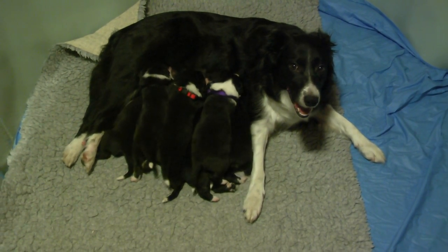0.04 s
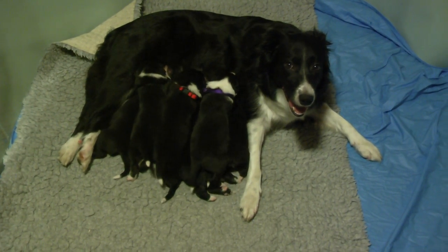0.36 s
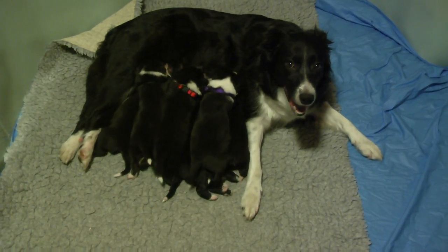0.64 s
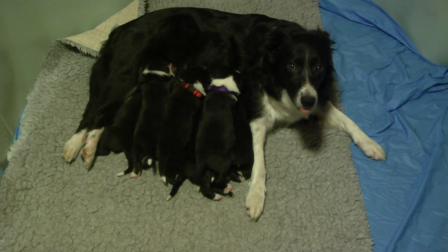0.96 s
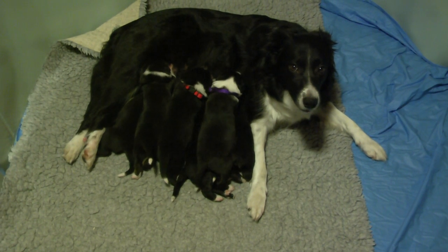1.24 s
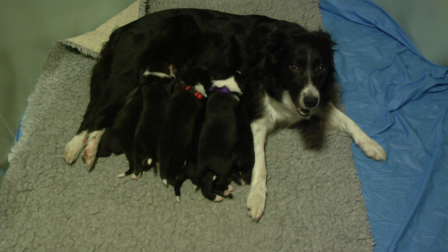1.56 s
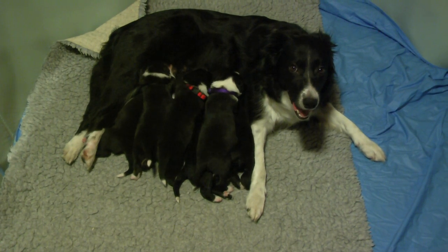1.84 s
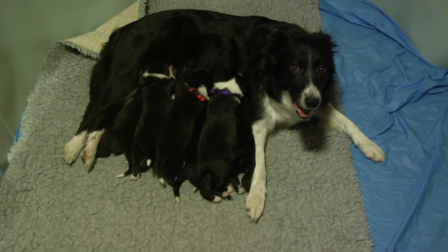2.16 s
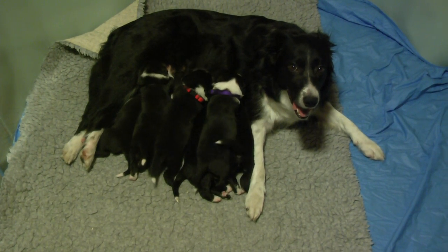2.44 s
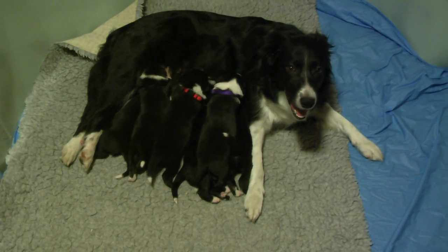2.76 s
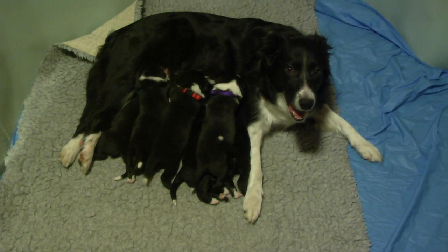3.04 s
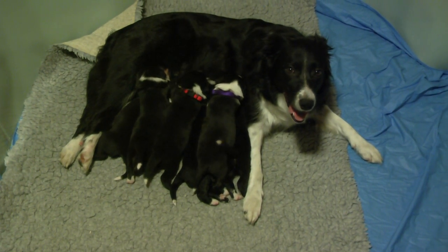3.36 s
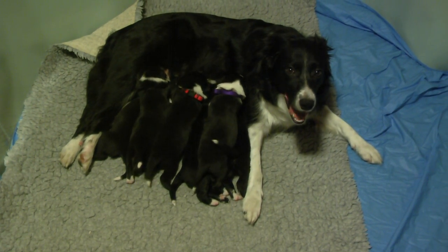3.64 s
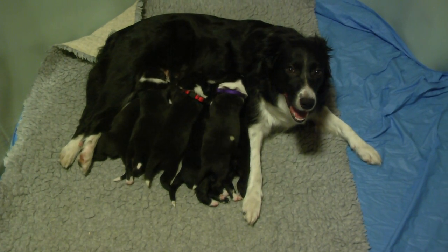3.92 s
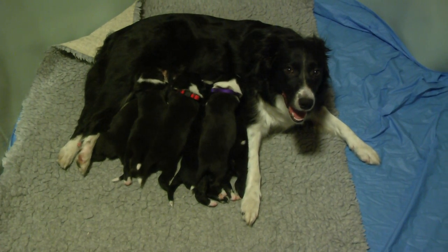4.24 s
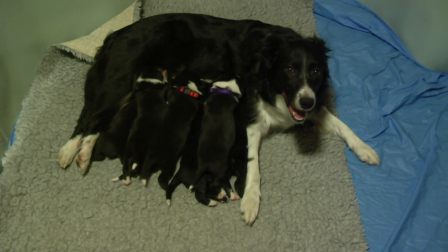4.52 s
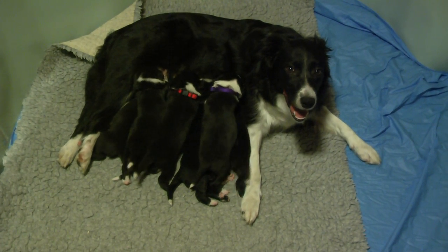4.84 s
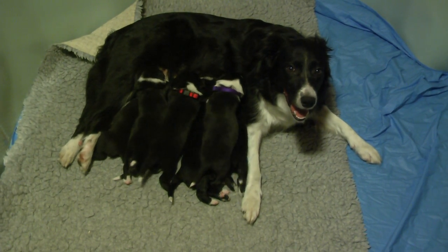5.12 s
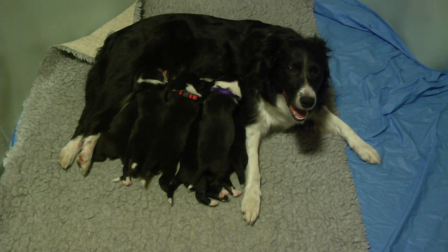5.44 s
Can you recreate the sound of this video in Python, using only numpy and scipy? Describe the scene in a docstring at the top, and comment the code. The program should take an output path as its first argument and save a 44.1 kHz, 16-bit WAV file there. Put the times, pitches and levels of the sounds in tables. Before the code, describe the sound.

Wet lip smacks and little clicks of nursing puppies grow busier over a dog's soft panting and faint room hum.

```python
"""Puppies suckling beside their mother on a rug in a small, quiet room; one microphone above them.
From the start, over still air and a faint hum, the mother pants softly, about three times a second.
Tongues click off the teats, gulps and nudges plop low, and near 0.9 s wet lips smack: films of milk
tearing in swelling bursts of tiny clicks. From 3.3 s the smacks crowd in, at first with thin squeaks;
the loudest falls at 4.1 s and softer ones follow to the end. The bare walls answer each sound."""
import sys
import numpy as np
from scipy import signal
from scipy.fft import rfft, irfft
from scipy.io import wavfile
from scipy.ndimage import uniform_filter1d

SR = 44100
rng = np.random.default_rng(int(sys.argv[2]) if len(sys.argv) > 2 else 0)


def wav_record(signal):
    """Record a signal, one row per channel, as 16-bit PCM in the file named by sys.argv[1]."""
    frames = np.transpose(np.atleast_2d(signal))
    bounded = np.clip(frames, -1, 1)
    # unit amplitude maps onto the largest positive 16-bit level
    quanta = np.round(bounded * 32767).astype(np.int16)
    wavfile.write(sys.argv[1], SR, quanta)


N = 246078


def gain_of(db):
    """Decibels to amplitude."""
    return 10 ** (np.asarray(db) / 20)


def unit_rms(x):
    """Scales to rms 1."""
    return x / np.sqrt(np.mean(x ** 2) + 1e-20)


def read(points, hz):
    """Reads a table on a log-frequency axis."""
    f, value = np.transpose(points)
    return np.interp(np.log(hz + 1), np.log(f + 1), value)


def shelf(hz, edge_hz):
    """Rises from 0 to 1 over the octave above the edge."""
    return np.clip(np.log2(hz / edge_hz), 0, 1)


def colour(x, curve_db, size=4096):
    """Minimum-phase filter whose gain is curve_db(Hz)."""
    hz = abs(np.fft.fftfreq(size, 1 / SR)) + 1
    log_gain = np.log(gain_of(np.maximum(curve_db(hz), -100)))
    response = np.exp(np.conj(signal.hilbert(log_gain)))
    return signal.fftconvolve(x, np.fft.ifft(response).real[:size // 2])


def add(mix, s, sound):
    """Mixes a sound in at s seconds."""
    part = mix[max(round(s * SR), 0):][:len(sound)]
    part += sound[:len(part)]


def room_tone(air_db=-65.5):
    """The still room: a steady low murmur of air, thin hiss and a faint electric hum."""
    # spectrum of the air: (frequency [Hz], relative density [dB])
    air_spectrum = [(15, -51), (25, -10.5), (64, -11), (309, 4.5), (363, -0.5), (607, -1), (775, -9.5),
                    (988, -5.5), (1790, -10.5), (1940, -11), (3160, -14), (5880, -16.5), (7710, -27),
                    (10100, -18.5), (16000, -20.5)]
    # electric tones: (frequency [Hz], level [dB])
    hum_tones = [(200, -80.5), (318, -77.5), (601, -78), (1000, -82), (2000, -81.5)]
    hz, t = np.fft.rfftfreq(N, 1 / SR), np.arange(N) / SR
    air = irfft(rfft(rng.standard_normal(N)) * gain_of(read(air_spectrum, hz)), N)
    hum = sum(gain_of(db) * np.sqrt(2) * np.sin(2 * np.pi * (f * t + rng.random()))
              for f, db in hum_tones)
    return gain_of(air_db) * unit_rms(air) + hum


def echo_paths(build_s=0.0025, echoes_per_s=5000):
    """Rug to microphone: direct sound, early reflections, and a tail that dies band by band."""
    # first reflections off floor and walls: (delay [s], gain against the direct sound [ratio])
    walls = [(.0023, 0.51), (.0056, 0.34), (.0072, 0.39), (.0094, 0.35), (0.0114, .45), (0.0253, 0.57)]
    # decay of the tail: (frequency [Hz], time to fall 60 dB [s])
    decay_times = [(150, 0.096), (500, 0.39), (1500, 0.29), (4000, 0.23), (8000, 0.23), (16000, 0.11)]
    # diffuse tail: (frequency [Hz], level against the direct sound [dB])
    tail_levels = [(150, -6), (500, -0.5), (1200, 2.5), (4000, -0.5), (16000, 2)]
    size = SR // 2
    echoes = rng.choice([-1., 1.], size) * (rng.random(size) < echoes_per_s / SR)
    hz, t, bands = signal.stft(echoes, SR, nperseg=256)
    decay = np.exp(-np.log(1000) * t / read(decay_times, hz)[:, None])
    tail = signal.istft(bands * decay, SR, nperseg=256)[1]
    tail *= 1 - np.exp(-np.arange(len(tail)) / SR / build_s)
    paths = colour(tail / np.linalg.norm(tail), lambda f: read(tail_levels, f))
    paths[0] += 1  # direct sound
    for delay, gain in walls:
        add(paths, delay * rng.uniform(.92, 1.08), np.array([gain]))
    return paths / np.linalg.norm(paths)


def room(x, hold_s=.23, tails=4):
    """The room's short echo; several random tails take turns so no single colouring sticks."""
    turn = np.arange(N) // round(hold_s * SR) % tails
    crossfades = [uniform_filter1d(1. * (turn == k), size=512) for k in range(tails)]
    return sum(signal.fftconvolve(x * share, echo_paths())[:N] for share in crossfades)


def breath(length_s, db, hiss_db, lift_db=12, teeth_hz=5500, tongue_db=1.0, ticks_per_s=55, tick_gain=13):
    """One stroke of panting: an arch of turbulence and saliva ticks, shaped anew by the tongue."""
    # air over her tongue: (frequency [Hz], relative density [dB])
    muzzle = [(200, -1.5), (600, -9), (1200, -4.5), (2100, -2), (3000, -3.5), (4200, -3), (5300, 2),
              (6500, 2), (16000, -14)]
    flow = np.sin(np.linspace(0, np.pi, max(round(length_s * SR), 2))).clip(0) ** 0.75
    saliva = tick_gain * (rng.random(SR) < ticks_per_s / SR)
    air = (rng.standard_normal(SR) + saliva)[:len(flow)] * flow
    tongue = np.column_stack([np.linspace(0, SR / 2, 60), tongue_db * rng.standard_normal(60)])

    def breath_db(hz):
        return db + lift_db + read(muzzle, hz) + hiss_db * shelf(hz, teeth_hz) + read(tongue, hz)
    return colour(air, breath_db)


def panting(turn_s=0.039, in_s=0.22, rest_s=0.028, in_hiss_db=1.5):
    """The mother breathes out, pauses, and draws air in over her teeth until the next cycle is near."""
    # cycles: (time [s], stroke out [s], relative level out [dB], relative level in [dB], teeth hiss [dB])
    pants = [(0, 0.028, -70, -86, 2), (.17, 0.14, -65.5, -69, 2), (.48, .15, -66.5, -70, 2),
             (.87, 0.13, -66.5, -71.5, 1), (1.115, 0.24, -67.5, -75, 4.5), (1.535, .145, -64.5, -68, 1.5),
             (1.92, .13, -66.5, -72.5, 0), (2.23, 0.11, -67, -72.5, 4.5), (2.58, .15, -80, -70.5, -0.5),
             (2.89, 0.11, -63, -69.5, -3), (3.32, 0.11, -61.5, -77, 3), (3.6, 0.26, -65.5, -80, -0.5),
             (3.921, 0.092, -71, -94, 2.5), (4.199, 0.078, -69.5, -85, 0), (4.59, .15, -62, -60.5, 3),
             (5.09, .2, -64.5, -79, 1.5)]
    out = np.zeros(N)
    ends = [row[0] for row in pants[1:]] + [N / SR]
    for (s, out_s, out_db, in_db, hiss_db), end in zip(pants, ends):
        in_start = s + out_s + turn_s
        in_length = min(in_s, end - rest_s - in_start)
        add(out, s, breath(out_s, out_db, hiss_db))
        add(out, in_start, breath(in_length, in_db, hiss_db + in_hiss_db))
    return out


def nudges(edge_hz=340, low_hz=130):
    """Paws and bodies bump the rug, which muffles each short scuff down to its lows."""
    # bumps: (time [s], strength [dB], fade [s])
    bumps = [(.895, -8, 0.027), (1.045, -11, 0.015), (1.098, -8.5, 0.0067), (1.645, -8.5, 0.016),
             (1.679, -5, 0.0053), (1.812, -11, 0.011), (2.273, -7.5, 0.019), (3.186, -12, .004),
             (5.158, -7, 0.0042)]

    def rug_loss_db(hz):
        return 10 * np.log10((1 + (hz / edge_hz) ** 4) * (1 + (low_hz / hz) ** 2))
    out = np.zeros(N)
    t = np.arange(SR // 6) / SR
    for s, db, fade_s in bumps:
        scuff = rng.standard_normal(len(t)) * np.exp(-(t / fade_s) ** 2 / 2)
        add(out, s, colour(scuff / np.linalg.norm(scuff), lambda hz: db - rug_loss_db(hz)))
    return out


def plop(db, hz, t60, onset_s=0.0022, sag=0.025):
    """A soft pocket of throat or belly rings for a few cycles and sinks in pitch."""
    t = np.arange(SR // 5) / SR
    pitch = hz * (1 + sag * (2 * np.exp(-2 * t / t60) - 1))
    envelope = (1 - np.exp(-t / onset_s)) * np.exp(-np.log(1000) * t / t60)
    return gain_of(db) * envelope * np.sin(2 * np.pi * np.cumsum(pitch) / SR)


def faint_swallows(db=-63, range_db=7, count=40):
    """The litter keeps up faint swallows at random moments."""
    out = np.zeros(N)
    for when, size, pitch in rng.random((count, 3)):
        add(out, when * N / SR, plop(db + range_db * size, hz=200 + 450 * pitch, t60=0.085))
    return out


def gulps(ring_cycles=14):
    """The louder swallows: a deeper gulp rings longer."""
    # gulps: (time [s], relative level [dB], pitch [Hz])
    plops = [(.263, -37, 424), (.87, -50, 436), (1.045, -52, 212), (1.103, -59, 99), (1.784, -44.5, 280),
             (1.805, -44, 297), (1.834, -48.5, 215), (2.022, -45.5, 580), (2.083, -42.5, 457),
             (3.29, -49, 463), (3.806, -45.5, 293), (4.635, -48.5, 309), (5.157, -47, 187),
             (5.275, -49.5, 310)]
    out = np.zeros(N)
    for s, db, hz in plops:
        add(out, s, plop(db, hz, t60=ring_cycles / hz))
    return out


def lip_squeaks(length_s=0.012, sag=0.037, waver=0.021):
    """Air squeezes through a wet gap: a thin, unsteady whistle that sinks as the suction eases."""
    # squeaks: (time [s], relative level [dB], starting pitch [Hz])
    squeaks = [(3.326, -53, 10500), (3.457, -39.5, 7260), (3.617, -55, 14000)]
    out = np.zeros(N)
    n = round(length_s * SR)
    for s, db, hz in squeaks:
        wobble = unit_rms(uniform_filter1d(rng.standard_normal(n), 24))
        pitch = np.linspace(hz, hz * (1 - sag), n) * (1 + waver * wobble)
        add(out, s, gain_of(db) * np.hanning(n) * np.sin(2 * np.pi * np.cumsum(pitch) / SR))
    return out


def milk_tear(db, fade_s, mouth_hz, q, spray_db, swell_s=.001, clicks_per_s=1700, spread_db=4,
              fizz=0.076, spray_hz=4500, top_hz=12800, top_db=-32, fine_hz=7000, fine_lag_s=0.0019):
    """A film of milk tears in a burst of tiny clicks, which ring the mouth cavity."""
    n = SR // 4
    t = np.arange(n) / SR
    pull = np.interp(t, [0, swell_s], [0.29, 1])
    pull *= np.exp(-(np.maximum(t - swell_s, 0) / fade_s) ** 2 / 2)
    snaps = rng.random(n) < clicks_per_s / SR
    clicks = snaps * gain_of(spread_db * np.clip(rng.standard_normal(n), -2, 2))
    clicks[[0, round(swell_s * SR)]] = 3.5  # the lips part, then the seal lets go
    tear = pull * (clicks * rng.choice([-1, 1], n) + fizz * rng.standard_normal(n))
    tear /= np.linalg.norm(tear)
    coarse = signal.sosfiltfilt(signal.butter(2, fine_hz, fs=SR, output="sos"), tear, padtype=None)
    # the finest threads snap only once the pull is strong, so the top comes late
    fine = (tear - coarse) * np.sqrt(2) * pull * (1 - np.exp(-t / fine_lag_s))
    bass_edge_hz = 0.1 * min(mouth_hz, spray_hz / 2)  # a small mouth radiates little bass

    def mouth_db(hz):
        detuning = q * (hz / mouth_hz - mouth_hz / hz)
        cavity_db = -5.2 * np.log10(1 + detuning ** 4)  # soft walls: a blunt peak
        opening_db = -10 * np.log10(1 + (bass_edge_hz / hz) ** 2)
        return db + cavity_db + opening_db + spray_db * shelf(hz, spray_hz) + top_db * shelf(hz, top_hz)
    return colour(coarse + fine, mouth_db)


def faint_clicks(db=-33, range_db=7, low_hz=1000, high_hz=3400, count=14):
    """Small tongue clicks from all over the litter."""
    out = np.zeros(N)
    for when, size, pitch in rng.random((count, 3)):
        mouth_hz = low_hz * (high_hz / low_hz) ** pitch
        click = milk_tear(db + range_db * size, fade_s=0.0022, mouth_hz=mouth_hz, q=0.82, spray_db=-8)
        add(out, when * N / SR, click)
    return out


def tongue_clicks():
    """Tongues snap off the teat: a wet tear with almost no build-up."""
    # clicks: (time [s], strength [dB], fade [s], mouth resonance [Hz], sharpness [Q], treble spray [dB])
    clicks = [(.077, -18, 0.0086, 1320, 0.87, -12), (.253, -8.5, 0.0014, 816, 3.4, 22),
              (.257, -12, .0015, 5160, 4, 8), (.694, -11, .001, 1290, 2.2, -10),
              (1.678, -4, .006, 1545, 2.5, -10), (1.815, -15, 0.0072, 1300, .9, 13),
              (2.006, -12, 0.0055, 1300, 0.79, 7), (2.083, -12.5, 0.0049, 900, 4.9, -10),
              (2.657, -14, 0.022, 1630, 1.25, 8), (3.019, -19, 0.014, 11960, 0.96, 0.5),
              (3.072, -4, 0.0055, 3600, 1.05, -3), (3.185, -5, 0.0024, 640, 1.3, -13),
              (3.2, -7, .003, 546, 3.9, -10), (3.264, -18.5, .0015, 3930, 2.2, -2),
              (3.459, -3.5, .006, 580, 1.3, 5), (3.664, .5, .006, 2420, 1, -7),
              (3.794, -6, 0.0063, 930, 1.34, 1), (4.005, -23, 0.0034, 3220, 1.4, -10),
              (5.157, -1, .0045, 2860, 0.89, -10), (5.242, -15.5, .002, 2780, 0.32, -27),
              (5.359, -16.5, .0035, 2850, 0.74, -9)]
    out = np.zeros(N)
    for s, db, fade_s, mouth_hz, q, spray_db in clicks:
        add(out, s, milk_tear(db, fade_s, mouth_hz, q, spray_db))
    return out


def lip_smacks(least_fade_s=0.0022, fade_per_swell=0.44):
    """Suction builds, then the seal gives way: the longer the pull, the longer the release."""
    # smacks: (time [s], strength [dB], swell [s], mouth resonance [Hz], sharpness [Q], treble spray [dB])
    smacks = [(.755, -20.5, 0.018, 1600, 0.54, -7), (.897, -15.5, .008, 1480, 2.5, -4),
              (.923, -5.5, .005, 2700, 5.6, 6), (1.645, -16.5, 0.016, 1550, .8, -2),
              (1.765, -12.5, 0.019, 960, 1.7, -11), (3.323, 0.5, 0.0062, 2770, 5.7, 4),
              (3.325, -5, .005, 4800, 1.9, 2.5), (3.377, -4, .016, 3370, 0.95, -22),
              (3.458, -1.5, 0.0035, 2940, 0.8, -12), (3.675, -0.5, .016, 2240, 0.62, -12),
              (3.774, -9.5, .004, 2000, 0.47, -4), (4.105, 13.5, .005, 3800, 2.6, 4),
              (4.113, 15.8, .0045, 3850, 2.4, 6), (4.326, -1, 0.016, 3630, 0.64, -13.5),
              (4.548, -2, .008, 3760, 0.6, -4.5), (4.615, -5.5, .021, 1310, 0.78, 6),
              (4.828, 2, .038, 2380, 1.63, 3), (4.87, -8, 0.052, 11000, 0.94, 0),
              (5.072, -9, 0.016, 1600, 1.1, -9), (5.467, 4, .013, 2960, 2.14, -5),
              (5.484, -6, .005, 1350, 1.5, 3)]
    out = np.zeros(N)
    for s, db, swell_s, mouth_hz, q, spray_db in smacks:
        fade_s = least_fade_s + fade_per_swell * swell_s
        add(out, s, milk_tear(db, fade_s, mouth_hz, q, spray_db, swell_s))
    return out


def suckling():
    """Lips and tongues at the teats, all coloured by the same narrow resonances."""
    # resonances: (frequency [Hz], width [Hz], lift [dB])
    rings = [(2000, 17, -7), (2360, 24, 0.5), (3270, 100, 4), (3376, 58, 6.5), (3600, 74, 7.5),
             (3810, 120, 5.5), (4160, 53, 7), (4370, 55, 3)]

    def rings_db(hz):
        return sum(db / (1 + (2 * (hz - f) / width) ** 2) for f, width, db in rings)
    return colour(lip_smacks() + tongue_clicks() + faint_clicks(), rings_db)[:N]


def scene(suckling_db=-2.0, gulps_db=4.0):
    """The dogs on their rug, picked up through the room by the microphone above."""
    # dull dip and roll-off of the microphone: (frequency [Hz], gain [dB])
    microphone = [(60, -13.5), (130, 4.5), (6000, -4), (7400, -16.5), (8200, -17.5), (9400, -1.5),
                  (11500, -1), (14500, -2), (16500, -2)]
    mouths = gain_of(suckling_db) * suckling() + lip_squeaks()
    bodies = gain_of(gulps_db) * gulps() + nudges() + faint_swallows()
    dogs = room(mouths + bodies + panting())
    heard = colour(dogs, lambda hz: read(microphone, hz))[:N]
    return (heard + room_tone())[None]


def record(dry):
    """The recorder's band limit."""
    edge_hz = 16550
    lowpass = signal.firwin(511, edge_hz, window=("kaiser", 9), fs=SR)
    return signal.oaconvolve(dry, lowpass[None], "same")


dry = scene()
out = record(dry)
wav_record(out)
```